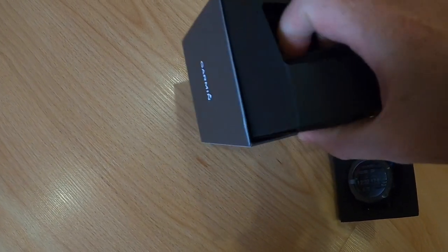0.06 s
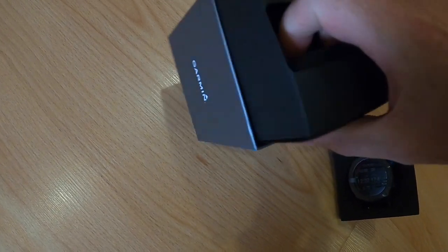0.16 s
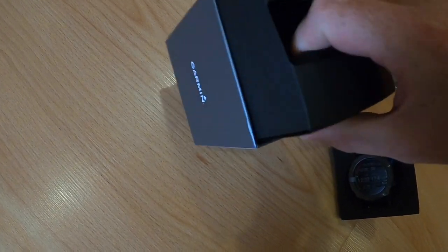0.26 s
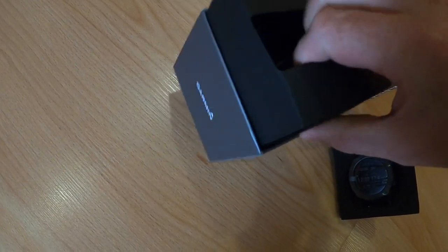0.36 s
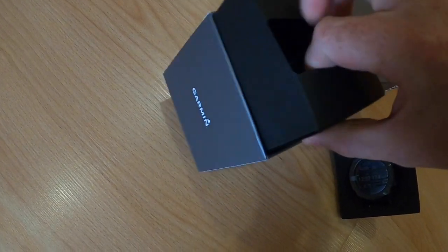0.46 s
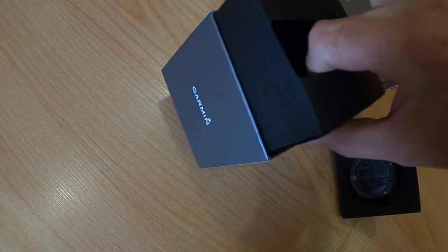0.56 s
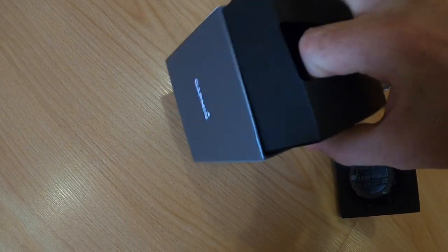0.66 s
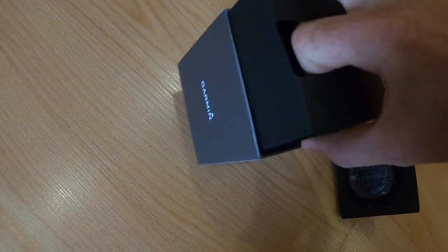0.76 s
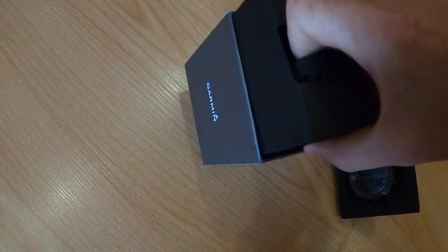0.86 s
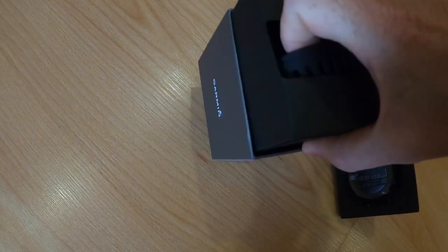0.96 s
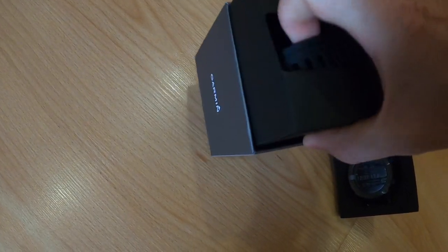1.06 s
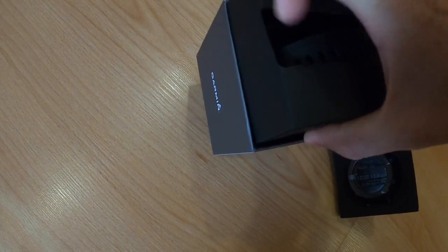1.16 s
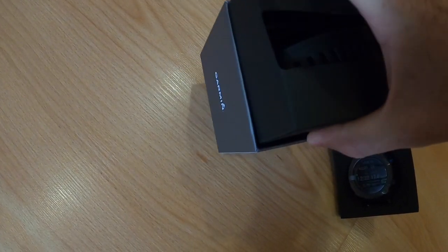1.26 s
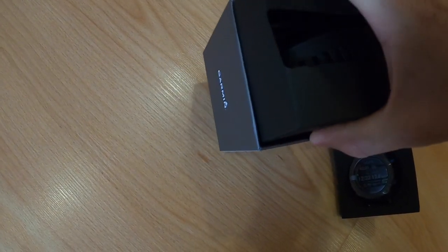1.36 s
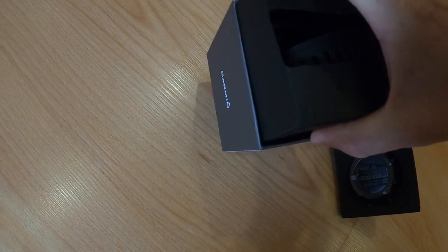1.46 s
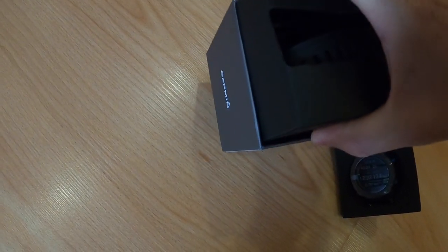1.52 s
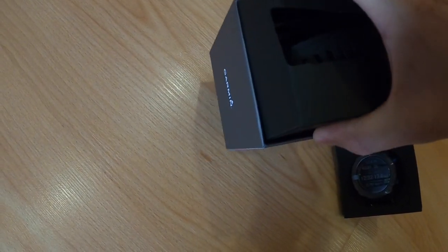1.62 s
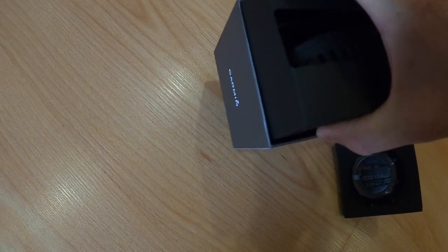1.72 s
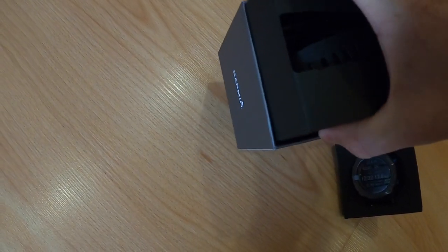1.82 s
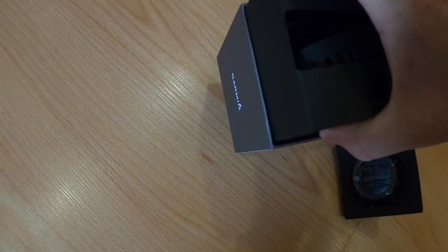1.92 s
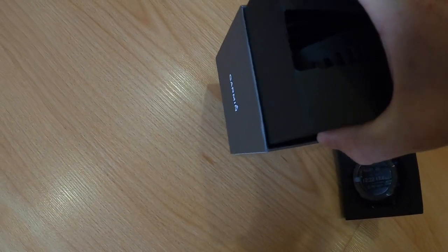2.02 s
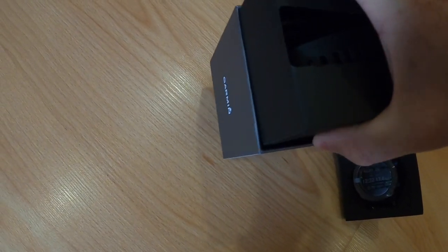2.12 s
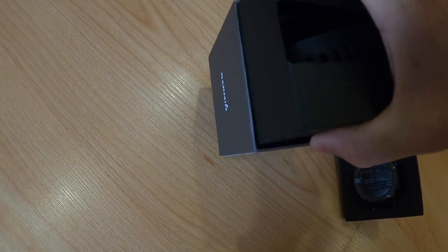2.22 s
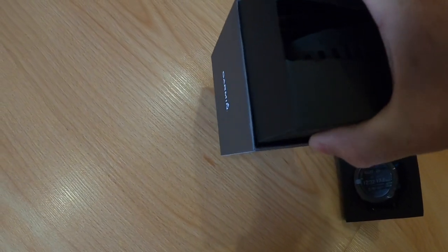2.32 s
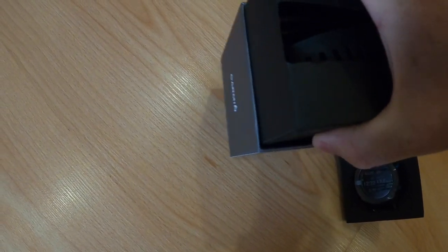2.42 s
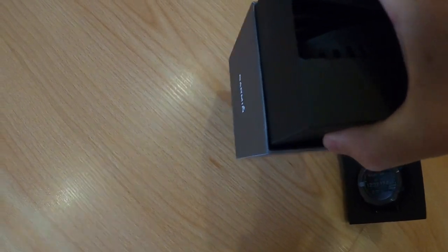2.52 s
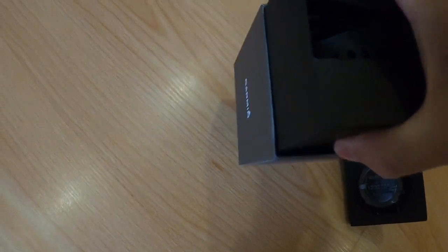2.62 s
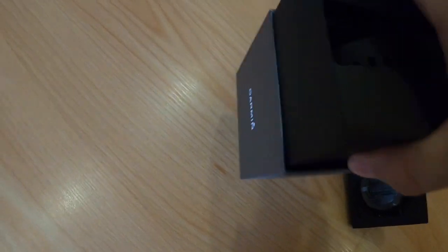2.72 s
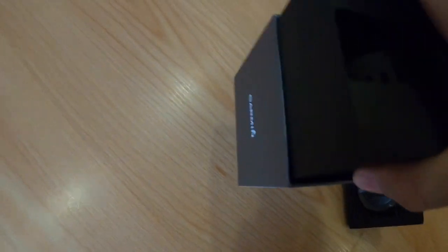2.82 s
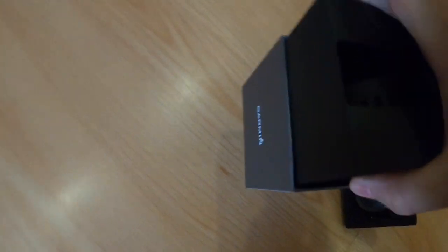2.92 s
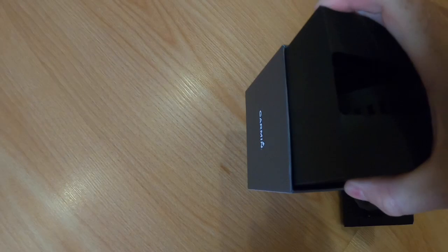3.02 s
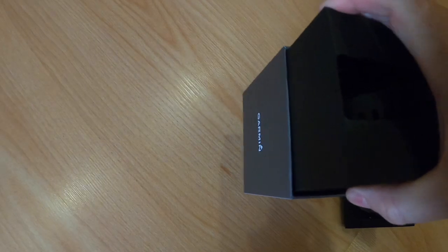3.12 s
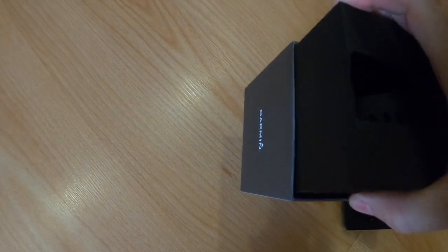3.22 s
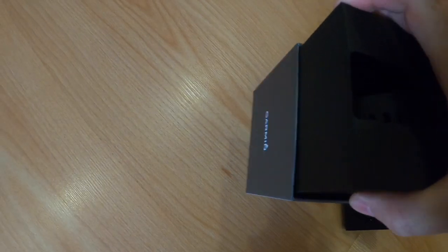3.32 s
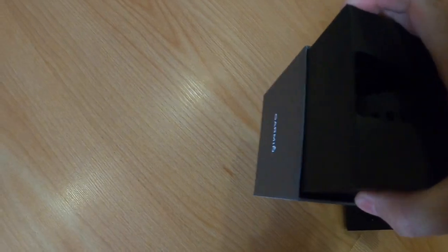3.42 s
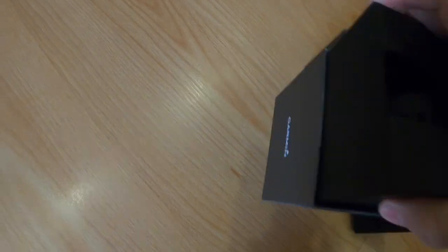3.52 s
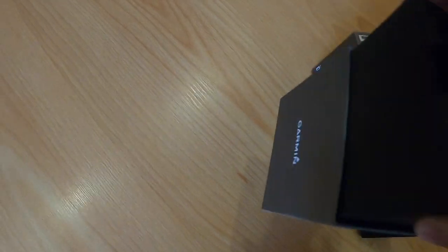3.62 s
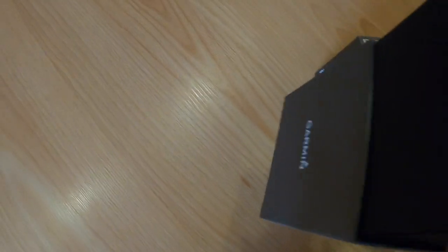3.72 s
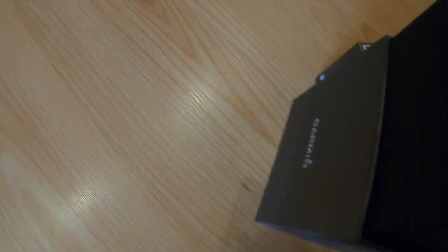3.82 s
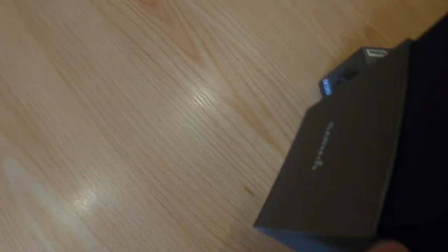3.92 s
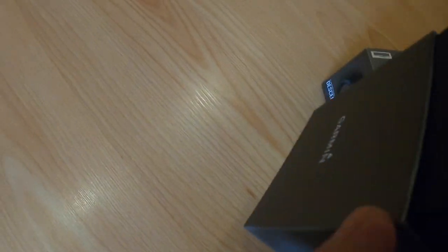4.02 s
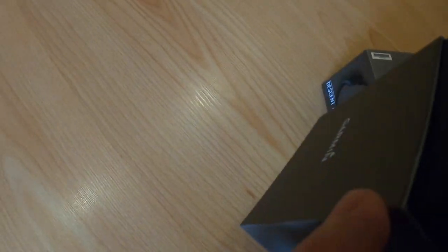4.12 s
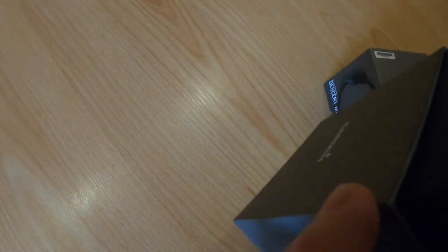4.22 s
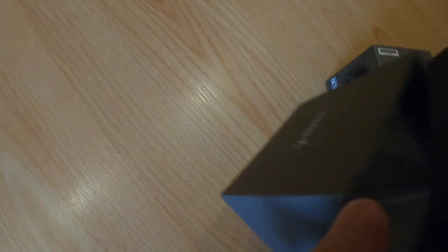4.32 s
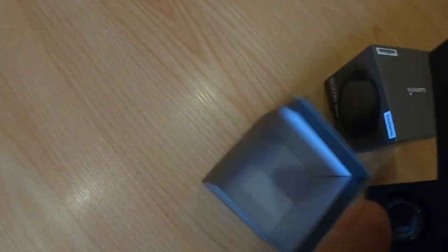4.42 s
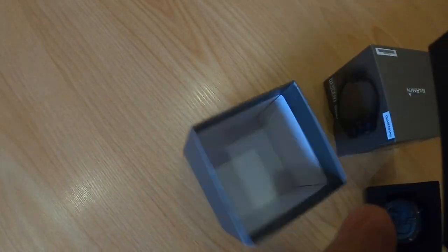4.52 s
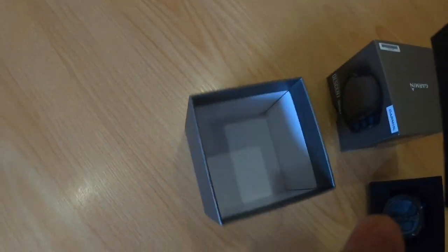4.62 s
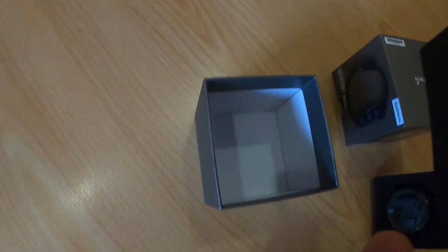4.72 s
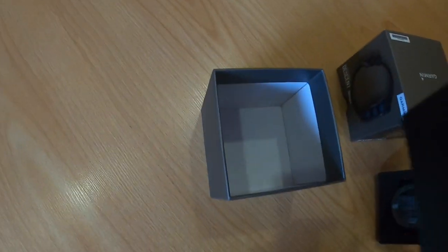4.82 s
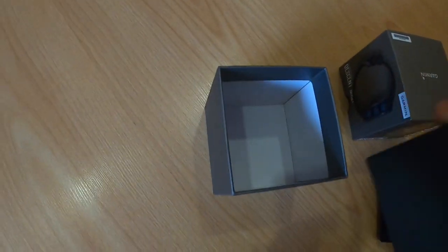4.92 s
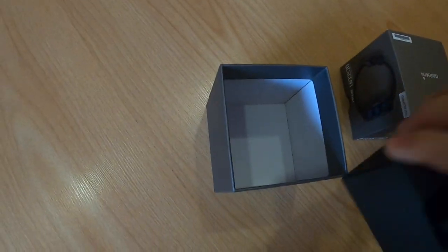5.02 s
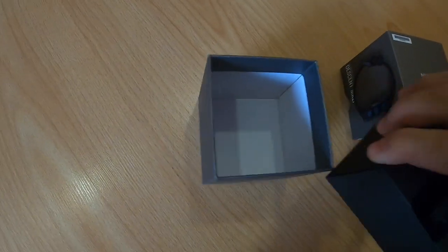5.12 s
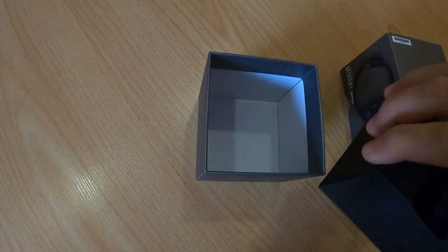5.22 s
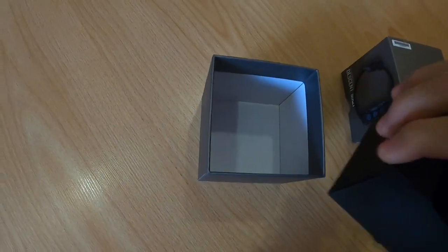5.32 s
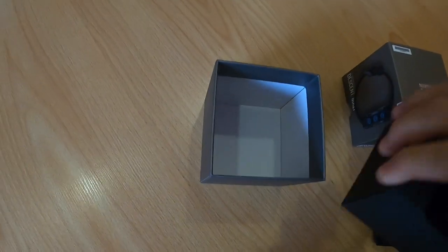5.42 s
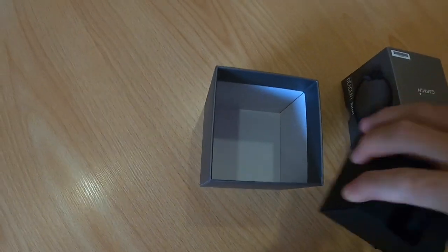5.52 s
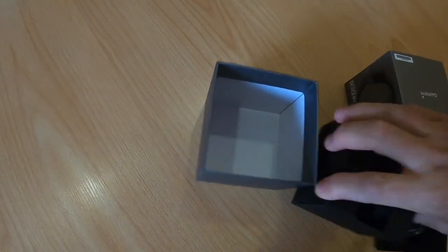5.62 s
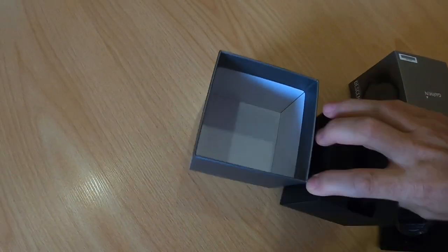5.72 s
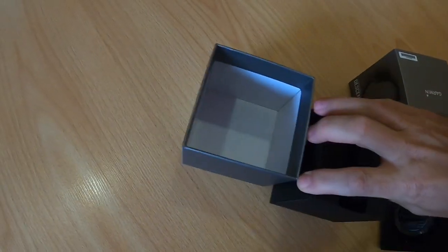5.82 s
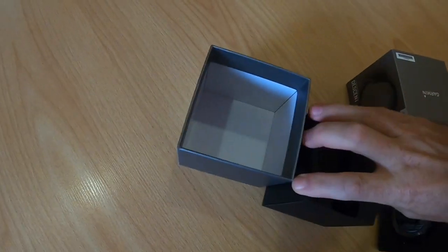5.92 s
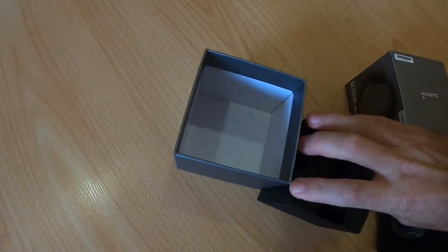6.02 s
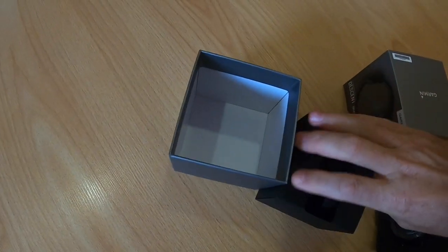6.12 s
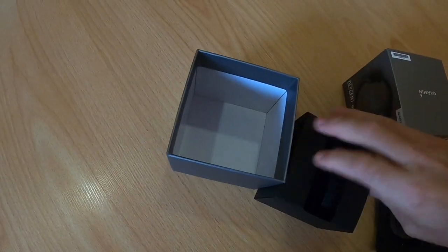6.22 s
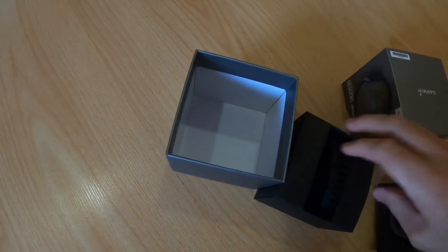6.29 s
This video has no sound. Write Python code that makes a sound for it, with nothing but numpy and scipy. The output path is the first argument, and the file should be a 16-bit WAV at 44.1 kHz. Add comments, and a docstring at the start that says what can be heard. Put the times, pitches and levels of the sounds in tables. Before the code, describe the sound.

A cardboard box is worked open with short scrapes and clicks; its lid drops loudly onto a wooden table, then lighter knocks follow.

```python
"""A stiff cardboard box, opened by hand just above a wooden table; close stereo camera, bare live room.
The card sticks and slips in short scrapes and clicks; the lid slides free, drops on the table and rocks
to rest; the base is set down. Each blow is a short bending wave, treble first, that rings the hollow card.
The falling lid drives the camera's limiter, which holds the room down for about a second.
Underneath lie a low drone, faint hiss and puffs of air on the microphone."""
import sys
import numpy as np
from scipy import signal
from scipy.fft import rfft, irfft, next_fast_len
from scipy.io import wavfile
from scipy.ndimage import uniform_filter1d, minimum_filter1d, map_coordinates

SR = 44100
rng = np.random.default_rng(int(sys.argv[2]) if len(sys.argv) > 2 else 0)


def materialize(psi):
    """Save the field psi as 16-bit PCM at rate SR to the path in sys.argv[1].

    A 1-D psi becomes a single channel; in a 2-D psi each row is a channel.
    """
    bounded = np.clip(np.atleast_2d(psi).T, -1, 1)
    quanta = np.round(bounded * 32767).astype(np.int16)
    wavfile.write(sys.argv[1], SR, quanta)


N = 280299
TIME = np.arange(N) / SR
BLOW_SAMPLES = 2048


def undb(db):
    """Decibels to gain."""
    return 10 ** (np.asarray(db) / 20)


def unit(x):
    """Scale to rms 1."""
    return x / np.sqrt(np.mean(np.abs(x) ** 2) + 1e-20)


def freqs(size):
    """Frequencies of a spectrum, kept above zero."""
    return np.maximum(np.fft.rfftfreq(size, 1 / SR), 1)


def gain_curve(f, points):
    """Gain along (f/Hz, level/dB) points."""
    hz, db = np.transpose(points)
    return undb(np.interp(np.log(f), np.log(hz), db))


def colour(x, points):
    """Filter a sound by (f/Hz, level/dB) points."""
    size = next_fast_len(x.shape[-1])
    return irfft(rfft(x, size) * gain_curve(freqs(size), points), size)[..., :x.shape[-1]]


def resonance(f, hz, width):
    """Response of one damped resonance, gain 1 at its centre."""
    return 1 / (1 + 1j * (f * f - hz * hz) / (f * width))


def add(out, t, x):
    """Mix x in at t seconds."""
    i = max(int(t * SR), 0)
    out[i:i + len(x)] += x[:max(N - i, 0)]


def stereo_noise(points, side_db):
    """Coloured noise with a share that differs between left and right."""
    mid, side = unit(colour(rng.standard_normal((2, N)), points))
    return mid + undb(side_db) * side * np.array([[1], [-1]])


# spectra of the room's drone and hiss: f/Hz, relative level/dB
DRONE_SPECTRUM = [(20, -8), (45, -4), (64, 7.5), (90, -14.5), (150, 5.5), (180, 3), (240, 2.5), (310, -3.5),
                  (420, -18.5), (800, -56)]
HISS_SPECTRUM = [(100, -27), (400, -4), (650, -14.5), (1200, -5), (2400, -13.5), (4000, -19.5), (8000, -30),
                 (15000, -41)]

def room_tone(drone_db=-48, hiss_db=-65):
    """The bare room: a steady low drone near the centre and a faint, wide hiss."""
    drone = undb(drone_db) * stereo_noise(DRONE_SPECTRUM, side_db=-16)
    return drone + undb(hiss_db) * stereo_noise(HISS_SPECTRUM, side_db=0.5)


# spectrum of skin on card: f/Hz, relative level/dB
SKIN_SPECTRUM = [(200, -19), (600, 2.5), (1300, 6.5), (3200, -12.5), (5500, -23.5), (9000, -40.5),
                 (15000, -42.5)]

def fingers(db=-61, rubs_per_s=120, decay_s=0.035):
    """Skin rubs faintly on the gripped card, least as the lid drops."""
    ticks = (rng.random(N) < rubs_per_s / SR) * (.3 + rng.random(N))
    envelope = signal.fftconvolve(ticks, np.exp(-TIME[:SR // 10] / decay_s))[:N]
    rub = colour(envelope * rng.standard_normal(N), SKIN_SPECTRUM)
    grip = np.interp(TIME, [4.3, 4.5, 5.5, 5.7], [1.0, 0.3, 0.71, 0.77])
    return undb(db) * grip * unit(rub)


def stick_slip(size, slips_per_s=220, release_s=.0018, steady_share=.3):
    """The card sticks and slips at uneven intervals; each slip tears loose a short burst of fibres."""
    onsets = np.cumsum(rng.gamma(3, 1 / 3, size // 40)) * SR / slips_per_s
    onsets = onsets[onsets < size].astype(int)
    clicks = np.zeros(size)
    clicks[onsets] = undb(2.5 * rng.standard_normal(len(onsets)))
    bursts = signal.lfilter([1], [1, -np.exp(-1 / (release_s * SR))], clicks)
    return (unit(bursts) + steady_share) * rng.choice([-1, 1], size)


# card sliding on card, close up: t/s, length/s, fastest point/share of length,
# wall rub/dB, hollow panel/dB, edge squeak/dB, fibre hiss/dB
SLIDES = [(0.005, 0.035, 0.39, -52, -48, -65, -72.0), (0.049, 0.02, 0.81, -42, -42, -41.5, -68),
          (0.109, 0.081, 0.99, -65, -49, -61, -68), (0.179, 0.066, 0.21, -44.0, -41, -52.5, -63),
          (0.243, 0.029, 0.4, -46, -67, -54, -61), (0.269, 0.015, 0.24, -51.5, -71, -66, -65),
          (0.308, 0.054, 0.3, -49.5, -70, -54.5, -53.5), (0.681, 0.083, 0.88, -59.5, -73, -62.5, -75),
          (0.819, 0.086, 0.31, -48.5, -51.5, -74, -60.5), (0.866, 0.13, 0.14, -49.5, -76, -57, -58),
          (0.928, 0.014, 0.18, -58, -66, -57.5, -75), (1.04, 0.089, 0.11, -52, -54.5, -51.5, -68.0),
          (1.085, 0.054, 0.52, -45.0, -50.5, -40.5, -58), (1.174, 0.038, 0.36, -58, -68, -65, -71),
          (1.245, 0.03, 0.18, -45.5, -45.5, -48, -58), (1.384, 0.037, 0.14, -54.5, -52.5, -51.5, -66.0),
          (1.422, 0.036, 0.1, -58.5, -57, -54.5, -70), (1.904, 0.16, 0.43, -44, -57, -49, -62),
          (2.608, 0.046, 0.15, -48.5, -53.5, -68, -67), (2.803, 0.07, 0.1, -72, -66.5, -81, -61.5),
          (2.979, 0.067, 0.38, -53, -63, -77, -61.5), (3.109, 0.086, 0.076, -64, -52.5, -74, -84.0),
          (3.513, 0.073, 0.22, -48, -56, -60, -66.5), (3.654, 0.077, 0.37, -55, -61.5, -65, -70),
          (4.118, 0.24, 0.95, -67, -48, -70, -83), (4.229, 0.067, 0.44, -46.5, -49, -62, -65.5),
          (4.316, 0.028, 0.42, -51, -59, -61.5, -60.5), (4.337, 0.034, 0.32, -42, -38, -52.5, -52),
          (4.367, 0.018, 0.56, -53, -53, -57, -62), (4.474, 0.062, 0.85, -60, -37.5, -61.5, -68.5),
          (4.546, 0.35, 0.099, -35, -35, -47, -60), (4.952, 0.26, 0.5, -53.5, -59, -64, -65.5),
          (5.134, 0.074, 0.2, -51, -58.5, -62, -52.5), (5.523, 0.08, 0.19, -64.5, -86.5, -72, -73),
          (5.608, 0.062, 0.58, -61.5, -85, -68, -69), (5.686, 0.096, 0.13, -51.5, -61, -67, -56.5),
          (5.794, 0.08, 1, -62, -59.5, -78, -72), (5.97, 0.2, 0.71, -53, -69, -68, -65.5),
          (6.322, 0.027, 0.21, -56, -61, -82, -61.5)]
# each grip tunes the free panel and rubbing edge: from t/s, panel f/Hz, width/share of f, squeak f/Hz
GRIPS = [(0, 940, 0.13, 3320), (0.17, 955, 0.19, 2220), (0.55, 1020, 0.38, 3090), (1.0, 560, 0.29, 3010),
         (1.35, 677, 0.58, 3180), (1.8, 570, 0.3, 3205), (2.5, 550, 0.68, 2240), (2.75, 533, 0.9, 2870),
         (4.28, 595, 0.18, 2840), (4.43, 862, 0.22, 2414), (4.9, 637, 0.79, 2750)]
# resonances of the stiff walls under friction: f/Hz, width/Hz, relative level/dB
WALL_RESONANCES = [(470, 250, 4), (1150, 980, 5), (2164, 280, 4), (3450, 1300, -2.5), (4655, 1000, -12)]
# hiss of the paper fibres: f/Hz, relative level/dB
FIBRE_SPECTRUM = [(3000, -38.5), (5000, -1.5), (6800, 2), (7600, 2), (8800, 3), (10500, -3), (13000, -7.5),
                  (15500, -10.5)]

def scrapes(dull_hz=6000, squeak_width_hz=290, glide=.012, fade_s=0.002, lid_lands_s=4.494):
    """Each slide swells and stops; its slips shake the walls, panel, rubbing edge and paper fibres."""
    out = np.zeros(N)
    for start, length, fastest, rub_db, panel_db, squeak_db, hiss_db in SLIDES:
        _, panel_hz, breadth, squeak_hz = GRIPS[sum(start >= grip[0] for grip in GRIPS[1:])]
        if start < lid_lands_s:  # a scrape begun before the lid lands stops at the landing
            length = min(length, lid_lands_s - start)
        size = next_fast_len(int(length * SR) + BLOW_SAMPLES)
        f, t = freqs(size), TIME[:size]
        speed = np.interp(t / length, [0, np.clip(fastest, .01, .99), 1], [0.45, 1, 0.1])
        fade = np.clip(np.minimum(t, length - t) / fade_s, 0, 1)
        force = rfft(stick_slip(size) * speed * fade)

        def shake(response, db):
            return undb(db) * unit(irfft(force * response, size))

        walls = sum(undb(db) * resonance(f, hz, width) for hz, width, db in WALL_RESONANCES)
        walls /= 1 + (f / dull_hz) ** 4
        panel = resonance(f, panel_hz, breadth * panel_hz) * resonance(f, panel_hz, panel_hz)
        # the rubbing edge rings in three close modes, a rough near-squeak
        low, centre, high = (resonance(f, ratio * squeak_hz, squeak_width_hz) for ratio in (.93, 1, 1.1))
        squeak = (low - centre + high) * resonance(f, squeak_hz, width=1100)
        card = shake(walls, rub_db) + shake(panel, panel_db) + shake(squeak, squeak_db)
        # as the contact travels, all resonances drift up or down
        drift = glide * rng.standard_normal() * (t / length - 1)
        card = map_coordinates(card, [SR * t * (1 + drift)])
        hiss = shake(gain_curve(f, FIBRE_SPECTRUM), hiss_db)
        add(out, start, (card + hiss) * np.sqrt(size / SR / length))
    return out


# spectrum of a hard edge contact, for a 700 Hz blow: f/Hz, relative level/dB
EDGE_SPECTRUM = [(300, -18.5), (700, -11), (1500, 1), (2300, -1), (3200, -1.5), (4000, -9.5), (5200, -13),
                 (8000, -21.5), (11000, -23.5), (15000, -29)]

def blow(hz, edge_db, breadth, noise, grit=0.6, grit_s=0.0029, scatter=0.34, scatter_s=0.0098,
         travel_1khz_s=0.0017, lead_s=.001):
    """One contact: a damped flex of the panel, a thud beneath it and a gritty edge."""
    f, t = freqs(BLOW_SAMPLES), TIME[:BLOW_SAMPLES]
    push = 1 / (1 + 1j * f / (2.74 * hz))  # a softer contact is both lower and duller
    leak = 1j * f / (0.015 * hz / breadth + 1j * f)  # slow motion only pushes air round the panel
    flex = unit(push * leak * resonance(f, hz, breadth * hz) * resonance(f, hz, 14 * breadth * hz))
    stiffness = hz / 700  # stiff spots click higher and thud less than broad faces
    thud = unit(push * resonance(f, 0.45 * hz, .5 * hz) * resonance(f, hz, 11 * hz))
    thud *= 2 * breadth * undb(-11) / stiffness
    edge = unit(gain_curve(f / stiffness ** 0.32, EDGE_SPECTRUM) * resonance(f, 2100, width=8400))
    edge *= undb(edge_db) / np.hypot(1, grit)
    crush = unit(rfft(noise * np.exp(-t / grit_s)))
    # the wave comes back from folds and corners as a short, dense tail
    folds = 1 + scatter * unit(rfft(noise[::-1] * np.sqrt(t) * np.exp(-t / scatter_s)))
    spectrum = (flex + thud + edge) * folds + grit * crush * edge
    # bending waves travel as the root of frequency, so every click sweeps downwards
    bending = np.exp(-4j * np.pi * travel_1khz_s * np.sqrt(1000 * f))
    wave = irfft(spectrum * bending * np.exp(2j * np.pi * f * lead_s))
    return np.roll(wave, BLOW_SAMPLES // 8)


# blows on card and table, close up: t/s, relative level/dB, f/Hz, sharp edge/dB, width/share of f
BLOWS = [ (0.0339, -12.5, 996, -4.5, 0.18), (0.0642, -17, 494, -3.5, 0.27), (0.15, -31, 605, -19, 0.26),
         (0.3709, -15.5, 1184, -2, 0.32), (0.3893, -23.5, 900, -3.5, 1.04), (0.8224, -34.5, 1160, -7, .3),
         (0.855, -34.5, 796, -16, 1.4), (0.8603, -29, 940, -16, 0.34), (0.9769, -26.5, 1200, -0.5, 0.23),
         (1.125, -27, 1110, -4, 0.35), (1.17, -28, 640, -6, 0.31), (1.2687, -25, 880, -8.5, 0.25),
         (1.3899, -38, 885, -1.5, 0.45), (1.494, -31, 1180, -2.5, 0.42), (1.8, -47.5, 800, 3.5, 0.35),
         (2.061, -30.5, 656, -25, 0.73), (2.278, -39, 565, -5.5, 0.36), (2.378, -26, 880, -5.5, 0.98),
         (2.5566, -24, 1240, -1, 0.25), (2.905, -46.5, 700, -6.5, 0.46), (3.3186, -38.5, 555, -2.5, 0.49),
         (3.573, -32, 515, -29, 0.45), (3.833, -27, 480, -4, 0.61), (3.925, -42, 600, -5.5, 0.31),
         (4.3745, -27.5, 680, -12, 0.11), (4.484, -21.5, 720, -31, 0.29), (4.494, 6, 704, -13, 0.67),
         (4.5076, -4, 543, -30, 0.51), (4.5187, 3, 543, -2.5, 0.73), (4.537, -7.5, 505, -26, 0.62),
         (4.6095, -4.5, 550, -8, 0.51), (4.6194, -1.5, 595, -6.5, 0.71), (4.6276, -4.5, 670, -8.5, 0.33),
         (4.6472, -7.5, 596, -19, 0.38), (4.7584, -17, 980, -13, 0.37), (5.1228, -15.5, 479.2, -42, 0.42),
         (5.6638, -21, 1100, -2.5, 0.4), (5.6669, -22, 490, -0.5, 0.59), (5.756, -24, 480, -5, 0.46),
         (5.851, -35, 657, -9, .3), (5.9394, -29.5, 1850, -4.5, 0.37), (6.0355, -27, 710, -23, 0.32),
         (6.1062, -29.5, 900, -5.5, 0.67), (6.116, -30.5, 604, -17, 0.19), (6.1586, -29, 740, -30, 0.24),
         (6.1648, -15.5, 690, 0.5, 1.02)]

def knocks(gain_db=18):
    """The box is gripped; the lid catches, gives, lands at 4.5 s and rocks; the base follows at 5.1 s."""
    out = np.zeros(N)
    for t, db, hz, edge_db, breadth in BLOWS:
        knock = blow(hz, edge_db, breadth, rng.standard_normal(BLOW_SAMPLES))
        add(out, t - BLOW_SAMPLES // 8 / SR, undb(db + gain_db) * knock)
    return out


# modes of the hollow box: f/Hz, relative level/dB, t60/s
HOLLOW_MODES = [(153, -32.5, 0.34), (324, -31, 0.13), (457, -20, 0.11), (528, -29.5, 0.082),
                (628, -26, 0.06), (696, -20.5, 0.074), (775, -32.5, 0.1), (980, -37.5, 0.071),
                (1155, -19, 0.045), (2660, -25, 0.017)]

def box_ring(blows, ring_db=-25, gripped_db=-8):
    """The hollow card rings on after a blow: freely in the falling lid, less under the fingers."""
    t = TIME[:SR // 2]
    ring = sum(undb(db - 60 * t / t60) * np.sin(2 * np.pi * hz * t) for hz, db, t60 in HOLLOW_MODES)
    loose = (TIME > 4.45) & (TIME < 5)
    drive = blows * np.where(loose, 1, undb(gripped_db))
    return undb(ring_db) * signal.fftconvolve(drive, ring)[:N]


def creaks(db=-31, hz=850, count=4):
    """Faint stray ticks of the card under strain while the lid is worked loose."""
    out = np.zeros(N)
    times = rng.uniform(1, 4.2, count)
    for t, (offset_db, detune) in zip(times, rng.standard_normal((count, 2))):
        noise = rng.standard_normal(BLOW_SAMPLES)
        tick = blow(hz * np.exp(.25 * detune), edge_db=-3, breadth=.3, noise=noise)
        add(out, t, undb(db + offset_db) * tick)
    return out


# air striking the microphone: t/s, level/dB
GUSTS = [(2.706, -42.5), (2.805, -34), (4.156, -36), (4.3, -30), (4.349, -38), (4.496, -16), (4.61, -46)]
# its rumble: f/Hz, relative level/dB
GUST_SPECTRUM = [(15, 5), (28, 1.5), (50, -1), (85, 3.5), (140, -9), (250, -6.5), (500, -52.5)]

def air_puffs(swell_s=0.002, decay_s=0.049):
    """Hands and lid push air at the nearby microphone in short, low puffs."""
    envelope = np.zeros(N)
    for t, db in GUSTS:
        swell = np.clip((TIME - t) / swell_s, 0, 1)
        envelope += undb(db) * swell * np.exp(-np.abs(TIME - t) / decay_s)
    return envelope * stereo_noise(GUST_SPECTRUM, side_db=-1.5)


# the box at the microphone's two ports: f/Hz, left minus right/dB
PORT_BALANCE = [(100, -1.5), (300, -5), (900, -3.5), (2200, -1.5), (4000, -3.5), (8000, -6.5), (13000, -14)]

def direct_sound(box, lag_s=.000046):
    """The box lies close by, to the right: the left port hears it later and duller."""
    size = next_fast_len(N + 64)
    f = freqs(size)
    ratio = gain_curve(f, PORT_BALANCE)
    left = ratio * np.exp(-2j * np.pi * f * lag_s)
    ports = np.array([left, np.ones(len(f))]) * 2 / (1 + ratio)
    return irfft(rfft(box, size) * ports, size)[:, :N]


# echo of the bare room: f/Hz, t60/s, relative level/dB
ECHO_BANDS = [(101, 0.42, -5), (306, 0.76, -15), (554, 0.52, -11.5), (950, 1.25, -14.5), (2040, 1.7, -11.5),
              (4500, 0.9, -12.5), (8540, 0.44, -13), (15000, 0.42, -19)]

def room_echo(x, wet_db=-1, gap_s=0.0022, build_s=0.017, alike_below_hz=2200):
    """A diffuse tail, longest in the upper middle and alike at both ports in the bass."""
    size = SR * 3 // 2
    f, t = freqs(size), TIME[:size]
    mid, side = rfft(rng.standard_normal((2, size)))
    apart = np.minimum(f / alike_below_hz, 1)
    noise = (mid + np.array([[1], [-1]]) * apart * side) / np.sqrt(1 + apart ** 2)
    log_centres = np.log([row[0] for row in ECHO_BANDS])
    tail = 0
    for (_, t60, db), weight in zip(ECHO_BANDS, np.eye(len(ECHO_BANDS))):
        fade = np.clip((t - gap_s) / build_s, 0, 1) * undb(-60 * t / t60)
        band = irfft(noise * np.interp(np.log(f), log_centres, weight), size)
        tail += undb(db) * band * fade / np.linalg.norm(fade)
    return undb(wet_db) * signal.fftconvolve(x[None], tail, axes=1)[:, :N]


def limiter(x, ceiling_db=-0.6, ahead_s=0.00088, hold_s=0.65, release_db_per_s=16.5):
    """Turn down just before a peak passes the ceiling, hold, then come back at a steady rate."""
    ahead, half_hold = int(ahead_s * SR), int(hold_s * SR) // 2
    peak_db = 20 * np.log10(np.abs(x).max(axis=0) + 1e-9)
    cut_db = minimum_filter1d(np.minimum(ceiling_db - peak_db, 0), 2 * ahead + 1)
    held_db = minimum_filter1d(cut_db, 2 * half_hold + 1, origin=half_hold)
    recovery_db = release_db_per_s * TIME
    gain_db = np.minimum.accumulate(held_db - recovery_db) + recovery_db
    return x * undb(uniform_filter1d(gain_db, ahead))


def scene():
    """Blows and friction on the box, heard from close by and through the room."""
    blows = knocks() + creaks()
    box = blows + box_ring(blows) + scrapes() + fingers()
    # as the box moves, the fine pattern of the room's echo changes
    place_times = np.linspace(0, N / SR, 7)
    crossfades = (np.sqrt(np.interp(TIME, place_times, here)) for here in np.eye(len(place_times)))
    echo = sum(room_echo(box * fade) for fade in crossfades)
    return direct_sound(box) + echo + room_tone() + air_puffs()


# falling treble of the camera's microphone: f/Hz, level/dB
MICROPHONE_RESPONSE = [(8800, 0), (11000, -8), (13000, -8), (15500, -34)]

def record(dry, top_hz=15700):
    """The camera dulls the treble, limits the peaks and cuts the top."""
    heard = limiter(colour(dry, MICROPHONE_RESPONSE))
    return signal.sosfilt(signal.ellip(8, .2, 70, top_hz, fs=SR, output="sos"), heard)


dry = scene()
out = record(dry)
materialize(out)
```